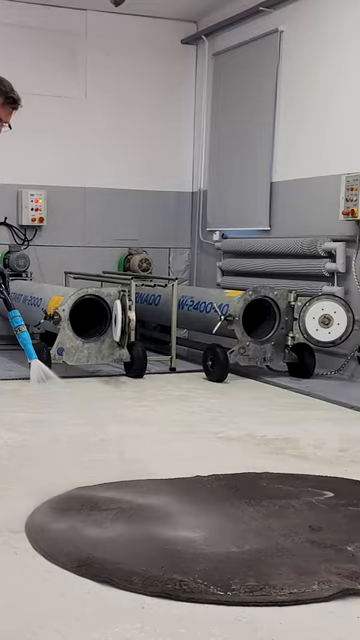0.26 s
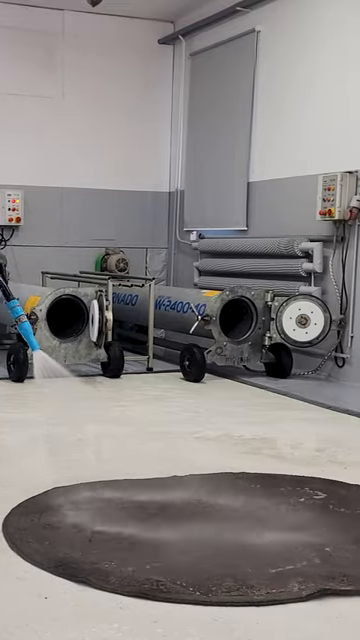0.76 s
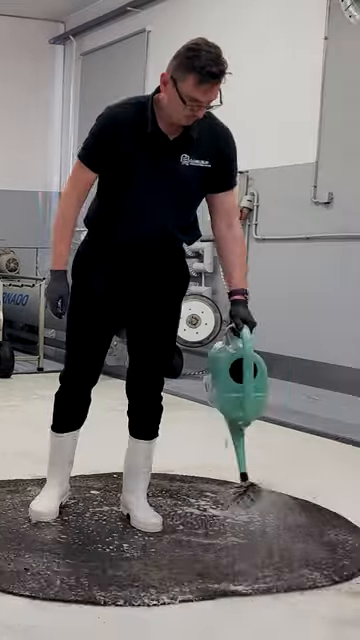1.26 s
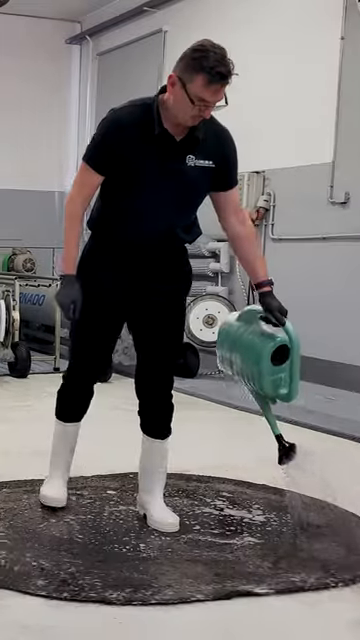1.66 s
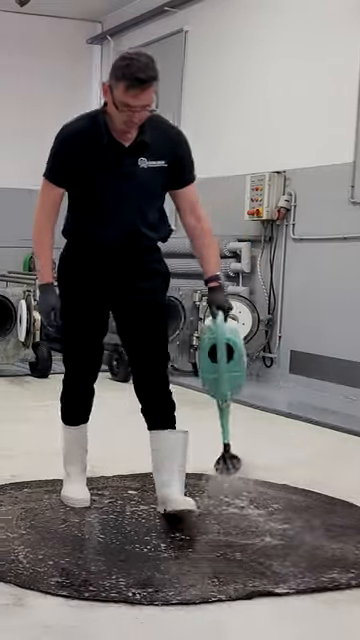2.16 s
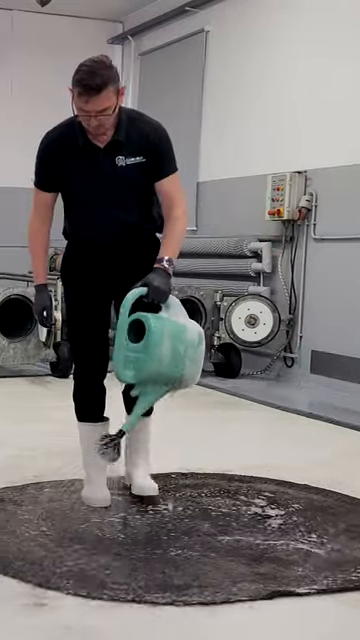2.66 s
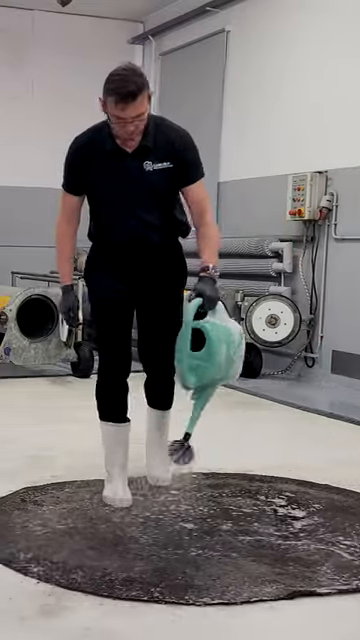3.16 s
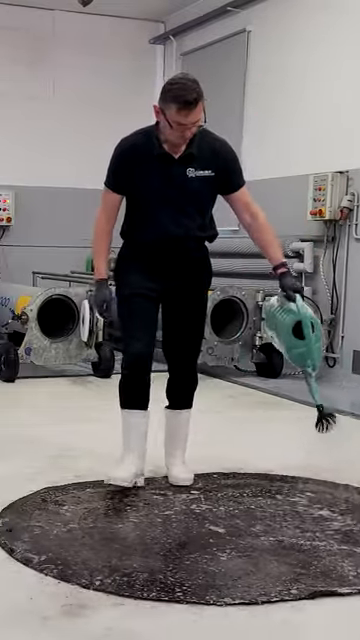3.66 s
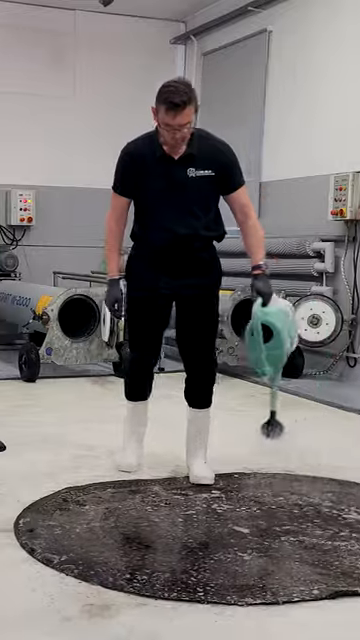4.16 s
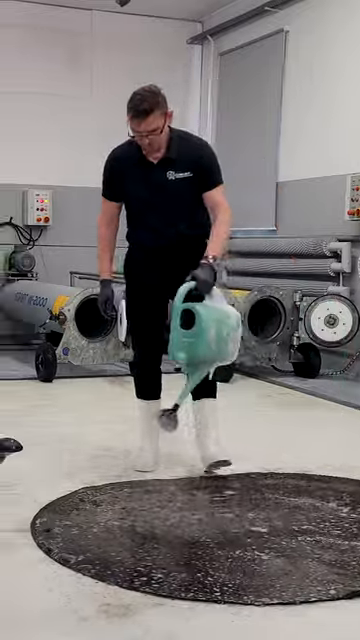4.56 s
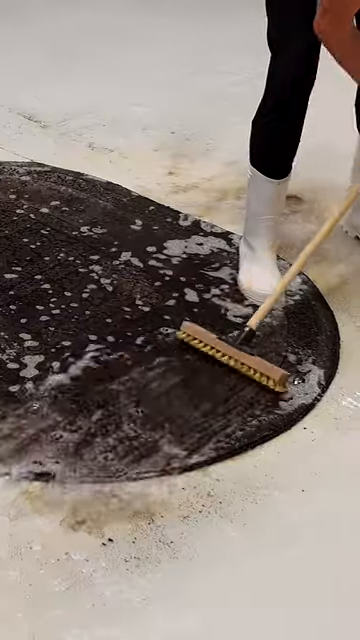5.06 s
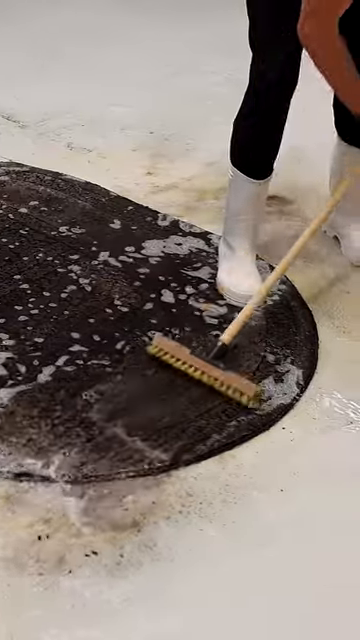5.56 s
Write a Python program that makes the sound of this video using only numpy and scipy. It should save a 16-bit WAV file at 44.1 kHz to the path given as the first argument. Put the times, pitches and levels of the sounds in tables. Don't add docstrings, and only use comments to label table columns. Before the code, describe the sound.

Pressurised spray fades out, light sprinkling with hollow plastic sloshing follows, and brisk bristle strokes scrape a soaked rug in a hard-walled hall.

```python
import sys
import numpy as np
from scipy import signal
from scipy.fft import rfft, irfft, next_fast_len
from scipy.io import wavfile

SR = 44100
rng = np.random.default_rng(int(sys.argv[2]) if len(sys.argv) > 2 else 0)


def gain_from_decibels(decibels):
    exponent = np.asarray(decibels, float) / 20
    return 10 ** exponent


def log_audio(samples):
    frames = np.atleast_2d(samples).T
    limited = np.clip(frames, -1, 1)
    pcm = np.round(limited * 32767).astype(np.int16)
    wavfile.write(sys.argv[1], SR, pcm)


N = 255780

# (frequency [Hz], density [dB per Hz])
LANCE_COLOUR_DB = [(24, -52), (40, -47), (91, -19.5), (218, -2), (360, -0.5), (474, 1.5), (536, -1),
                   (593, 5), (655, -3), (780, -1), (1730, -3.5), (9240, -6.5), (13100, 2), (15600, -2.5)]
SHOWER_COLOUR_DB = [(700, -73), (1000, -22), (1400, -26.5), (2000, -23), (5900, -11.5), (7800, -7),
                    (9000, -8), (12700, 0.5), (13800, 0.5), (15600, -7)]
BRUSH_COLOUR_DB = [(59, -59), (100, -28.5), (230, -22.5), (335, -11.5), (560, -8.5), (1000, -3.5),
                   (1300, -3), (1850, -1.5), (2700, -3), (6000, -6), (10500, -13), (13500, -8.5),
                   (16000, -18)]
HALL_COLOUR_DB = [(15, -54), (30, -27), (48, -16.5), (63, -12.5), (78, -15.5), (130, -15), (240, -20),
                  (400, -8), (700, -16.5), (1100, -25.5), (1500, -32)]
# (low edge [Hz], high edge [Hz])
LANCE_BANDS_HZ = [(120, 400), (430, 1000), (1500, 5000), (8000, 16000)]
SHOWER_BANDS_HZ = [(1400, 2200), (2300, 4000), (4500, 7500), (9000, 16000)]
BRUSH_BANDS_HZ = [(250, 800), (1000, 3000), (4000, 8000), (10000, 16000)]
HALL_BANDS_HZ = [(30, 200)]
# (frequency [Hz], shared power [0-1])
EAR_LIKENESS = [(30, .85), (60, .8), (130, .93), (290, .95), (500, .78), (750, .42), (1200, .03),
                (15000, 0)]

# (time [s], force [dB])
JET_FORCE_DB = [(0, -1), (.26, -1.5), (.39, .5), (.52, -1), (.64, 1), (.92, 0.5), (1.0, -0.5), (1.3, -3),
                (1.72, -11.5)]
# (level at 0 dB force [dB], slope [dB per dB force], share of surge [0-1], late fading loss [dB/s])
JET_LAYERS_DB = [
    (-52.5, 1.65, 0.75, 9),
    (-48.5, 1.16, 0.75, 2),
    (-48.5, 0.65, 0.3, 8.5),
    (-33.5, 1.26, 0.07, .5),
]
# (time [s], change [dB])
JET_SURGES_DB = [(.02, 4.5), (.13, 6), (.24, -1), (.33, 2), (.43, 1), (.7, 3), (.81, -0.5), (.89, 1.5),
                 (1.0, -2), (1.05, -2), (1.11, 1.5), (1.23, -2.5), (1.29, -0.5), (1.43, 5)]

# (time [s], fine patter [dB], left-right [dB])
ROSE_FLOW_DB = [(1.15, -50, 1), (1.55, -41, 1), (1.78, -43, 3.5), (2.11, -38.5, 3.5), (3.02, -37.5, 4.5),
                (3.4, -42.5, 3), (3.85, -41.5, 3), (4.05, -40, 2.5), (4.4, -38.5, 1), (4.52, -42, 3),
                (4.77, -47, 6)]
# (time [s], length [s], slap [dB], splash [dB])
PUDDLES_DB = [
    (1.448, 0.18, -62.5, -67),
    (1.928, 0.3, -67, -54),
    (2.512, 0.41, -82, -66.5),
    (3.1, 0.69, -73, -64.5),
    (3.977, 0.078, -62.5, -75),
    (4.078, .28, -89, -61),
    (4.356, 0.073, -58.5, -56.5),
    (4.51, .25, -65.5, -67),
]

# (time [s], length [s], level [dB], resonance [Hz])
SUMP_SLOSHES = [
    (2.17, .17, -69.5, 200),
    (3.1, 0.058, -65, 187),
    (3.36, 0.32, -62.5, 200),
    (4.15, 0.25, -66.5, 200),
]
BELLY_SLOSHES = [
    (1.002, .1, -50, 277),
    (1.25, .25, -60.5, 281),
    (2.1, .15, -54, 260),
    (2.312, .22, -54.5, 267.5),
    (3.294, .15, -53, 280),
    (3.47, .33, -56, 275),
    (4.02, .12, -61.5, 270),
    (4.164, 0.17, -49.5, 289),
    (4.414, .08, -60, 282),
]
NECK_SLOSHES = [
    (1.0, 0.22, -58, 400),
    (1.3, .35, -59, 420),
    (1.78, 0.33, -58.5, 440),
    (2.14, 0.27, -55.5, 395),
    (2.85, 0.19, -66, 436),
    (3.06, .35, -61.5, 408),
    (3.68, 0.21, -58, 410),
    (3.87, 0.19, -55.5, 423),
    (4.05, 0.13, -50, 375),
    (4.28, 0.1, -59, 370),
]
SHOULDER_SLOSHES = [
    (1.7, .55, -63, 670),
    (3.0, .35, -63, 620),
    (3.5, 0.28, -66, 600),
    (4.0, .3, -60, 700),
    (4.4, 0.38, -63.5, 620),
]
SPOUT_SLOSHES = [
    (1.0, .4, -62, 990),
    (1.48, 0.22, -56.5, 915),
    (1.82, 0.27, -60.5, 1013),
    (2.37, 0.023, -50.5, 880),
    (2.49, 0.043, -56, 885),
    (2.85, 0.27, -62, 1090),
    (3.07, 0.24, -57.5, 920),
    (3.66, 0.046, -63, 1070),
    (3.88, 0.2, -62, 1150),
    (4.39, 0.11, -61, 950),
]
CAN_WIDTHS_HZ = [40, 50.6, 155, 270, 264.6]
CAN_REST_LEVELS_DB = [-99, -78, -64.5, -76.5, -66]

# (time [s], delay to bristle grip [s], length [s], level [dB])
BRUSH_PUSHES = [
    (4.735, 0.022, .125, -1.5),
    (5.211, .001, .12, 1),
    (5.671, 0.0032, .13, -0.5),
]
# (time [s], length [s], level [dB])
BRUSH_PULLS = [
    (4.96, 0.2, -2),
    (5.468, 0.12, -1.5),
]
# (push [dB], rise [s], extra hold [s], fall [s], pull [dB])
BRUSH_LAYERS = [
    (-51.5, 0.066, 0.026, 0.28, -57.5),
    (-37.5, 0.068, 0.016, 0.13, -49),
    (-41.5, .018, .001, 0.11, -50),
    (-36.5, 0.015, .001, 0.091, -43.5),
]

# (time [s], peak [dB], left-right [dB])
BIG_DROPS = [(0.138, -19, 0.5), (0.2703, -32, 0.0), (0.3603, -26, 1.0), (0.5588, -24, 0.5),
             (0.6115, -28, 1.0), (0.6739, -23, 0.5), (0.902, -21, 1.0), (1.1079, -26, 1.0),
             (1.5359, -33, 2.5), (1.719, -31, 2), (1.8497, -27, 4.0), (1.934, -22, 2.5), (2.253, -18.5, 10),
             (2.3191, -33, 5.0), (2.4982, -20, 7), (2.587, -27, 15), (2.6572, -35, 5.0), (2.7751, -30, 3),
             (2.884, -30, 5.0), (3.5533, -29, 3), (3.6152, -22, 3.0), (3.6207, -21, 3.0), (3.814, -33, 7),
             (3.9165, -26, 3.5), (4.0532, -26, 3.5), (4.68, -26, 3)]
# (time [s], peak [dB], left-right [dB])
FOAM_FLICKS = [
    (4.739, -31, 3),
    (4.7419, -20.5, 9),
    (4.7465, -22, 7),
    (4.749, -24, 10),
    (4.753, -24, 5),
    (5.233, -35, 1.5),
    (5.697, -24, 2.5),
]
# (time [s], peak [dB], pitch [Hz])
BOOT_STEPS = [
    (2.70, -62, 62),
    (3.02, -56, 63),
    (3.139, -51.5, 66.6),
    (3.32, -59, 65),
    (3.98, -74, 60.5),
    (4.98, -56, 65),
    (5.66, -66.5, 62),
]
# (time [s], level [dB])
HALL_LEVEL_DB = [(0.0, -75), (1.1, -70.5), (1.8, -76), (2.3, -71), (4.38, -68.5), (4.55, -73.5), (5.8, -80)]


def lance():
    surge_s, fade_start_s = 0.027, 0.88
    start, (force_db,) = in_time(JET_FORCE_DB)
    t = np.arange(len(force_db)) / SR
    surge_db = sum(db * np.exp(-((t - s) / surge_s) ** 2) for s, db in JET_SURGES_DB)
    fading_s = np.maximum(t - fade_start_s, 0)
    levels_db = [db + slope * force_db + share * surge_db - loss * fading_s
                 for db, slope, share, loss in JET_LAYERS_DB]
    jet = spatter(levels_db, LANCE_COLOUR_DB, LANCE_BANDS_HZ, per_s=20000, spread_db=-0.5,
                  patchy_db=1.0, shared_db=0.5, rate_hz=33)
    return place(start, panned(jet, [0.35]), fade_s=0.21)


def shower():
    rise_s, fall_s = 0.048, 0.15
    dry_slap_db, dry_splash_db, patter_under_db = -89, -71.5, -15.5
    start, (fine_db, pan_db) = in_time(ROSE_FLOW_DB)
    t = (start + np.arange(len(fine_db))) / SR
    slaps, splashes = [], []
    for s, length_s, slap_db, splash_db in PUDDLES_DB:
        wet = swell(t, s, length_s, rise_s, fall_s)
        slaps.append(wet * gain_from_decibels(slap_db))
        splashes.append(wet * gain_from_decibels(splash_db))
    slap_db = total_db(gain_from_decibels(dry_slap_db), *slaps)
    splash_db = total_db(gain_from_decibels(dry_splash_db), *splashes)
    patter_db = total_db(gain_from_decibels(fine_db + patter_under_db), gain_from_decibels(splash_db))
    rain = spatter([slap_db, splash_db, patter_db, fine_db], SHOWER_COLOUR_DB, SHOWER_BANDS_HZ,
                   per_s=26000, spread_db=1.6, patchy_db=0.9, shared_db=0.6, rate_hz=40)
    high_pass = signal.butter(2, 8000, "high", fs=SR, output="sos")
    treble = signal.sosfiltfilt(high_pass, rain)
    return place(start, rain - treble + panned(treble, pan_db + 1.3), fade_s=0.008)


def can():
    start_s, end_s = 0.97, 4.78
    rise_s, fall_s, gurgle_db = 0.029, 0.079, 0.5
    t = np.arange(start_s, end_s, 1 / SR)
    size, out = len(t), 0
    spaces = [SUMP_SLOSHES, BELLY_SLOSHES, NECK_SLOSHES, SHOULDER_SLOSHES, SPOUT_SLOSHES]
    for sloshes, rest_db, width_hz in zip(spaces, CAN_REST_LEVELS_DB, CAN_WIDTHS_HZ):
        swells = [gain_from_decibels(db) * swell(t, s, length_s, rise_s, fall_s) for s, length_s, db, _ in sloshes]
        level_db = total_db(gain_from_decibels(rest_db), *swells)
        middles_s = [s + length_s / 2 for s, length_s, *_ in sloshes]
        hz = np.interp(t, middles_s, [row[3] for row in sloshes])
        rush = irfft(impacts(next_fast_len(size), per_s=4000, spread_db=2.0))[:, :size]
        gain = gain_from_decibels(level_db + gurgle_db * drift(17, size))
        out = out + gain * resonate(rush, hz, width_hz)
    return place(round(start_s * SR), panned(out, [1.5]), fade_s=0.065)


def brush():
    start, _, levels_db = strokes()
    scrub = spatter(levels_db, BRUSH_COLOUR_DB, BRUSH_BANDS_HZ, per_s=22000, spread_db=1.5,
                    patchy_db=-0.3, shared_db=-0.4, rate_hz=89)
    return place(start, panned(scrub, [1.2]), fade_s=0.004)


def strokes():
    pull_rise_s, pull_fall_s = 0.024, 0.075
    start = round(BRUSH_PUSHES[0][0] * SR)
    t, levels_db = np.arange(start, N) / SR, []
    for layer, (push_db, rise_s, hold_s, fall_s, pull_db) in enumerate(BRUSH_LAYERS):
        heights = []
        for s, grip_s, length_s, db in BRUSH_PUSHES:
            wait_s = grip_s if layer < 3 else 0
            push = swell(t, s + wait_s, length_s + hold_s, rise_s + wait_s, fall_s)
            heights.append(gain_from_decibels(push_db + db) * push)
        for s, length_s, db in BRUSH_PULLS:
            heights.append(gain_from_decibels(pull_db + db) * swell(t, s, length_s, pull_rise_s, pull_fall_s))
        levels_db.append(total_db(*heights))
    return start, t, levels_db


def brush_head():
    lag_s, hold_s, rise_s, fall_s = 0.087, 0.049, 0.02, 0.068
    grip_hz, sag_hz, sag_s = 1395, 150, 0.024
    start, t, _ = strokes()
    loads_s = [s + grip_s + lag_s for s, grip_s, *_ in BRUSH_PUSHES]
    since_s = np.min([np.where(t >= s, t - s, 9) for s in loads_s], axis=0)
    hz = grip_hz - sag_hz * (1 - np.exp(-since_s / sag_s))
    slips = irfft(impacts(next_fast_len(len(hz)), per_s=2000, spread_db=1.5))[:, :len(hz)]
    ring = resonate(slips, hz, width_hz=160)
    load = sum(swell(t, s, hold_s, rise_s, fall_s) for s in loads_s)
    return place(start, load * gain_from_decibels(-43.5 + 3.3 * drift(30, len(hz))) * ring)


def splats():
    ticks = BIG_DROPS + FOAM_FLICKS
    size, decay_s = 200, 0.00035
    out, t = np.zeros((2, N + size)), np.arange(size) / SR
    for s, peak_db, pan_db in ticks:
        burst = np.sign(rng.standard_normal((1, size))) * np.exp(-t / decay_s)
        at = round(s * SR)
        out[:, at:at + size] += gain_from_decibels(peak_db) * panned(burst, [pan_db])
    band_pass = signal.butter(3, [8500, 15000], "band", fs=SR, output="sos")
    return signal.sosfilt(band_pass, out[:, :N])


def boots():
    size, push_s = 8000, 0.064
    out, t = np.zeros(N + size), np.arange(size) / SR
    push = np.sin(np.pi * np.clip(t / push_s, 0, 1)) ** 2
    for s, peak_db, hz in BOOT_STEPS:
        at = round(s * SR)
        out[at:at + size] += gain_from_decibels(peak_db) * push * np.sin(2 * np.pi * hz * t)
    return out[:N]


def hall():
    start, levels_db = in_time(HALL_LEVEL_DB)
    rumble = spatter(levels_db, HALL_COLOUR_DB, HALL_BANDS_HZ, per_s=30000, spread_db=0,
                     patchy_db=1.6, shared_db=-0.4, rate_hz=1.16)
    return place(start, rumble)


def spatter(levels_db, colour, bands, per_s, spread_db, patchy_db, shared_db, rate_hz):
    length = len(levels_db[0])
    size = next_fast_len(length)
    hz = np.arange(size // 2 + 1) * SR / size + 1
    spectrum = impacts(size, per_s, spread_db) * gain_from_decibels(at_hz(colour, hz))
    power = np.mean(np.abs(spectrum) ** 2, axis=0) * 2 / size ** 2
    gains_db = []
    for level_db, (low, high) in zip(levels_db, bands):
        band_power = power[(hz > low) & (hz < high)].sum()
        gains_db.append(level_db - 10 * np.log10(band_power))
    centres = [np.log2(low * high) / 2 for low, high in bands]
    together_db = shared_db * drift(rate_hz, length)
    first = np.log2(colour[0][0]) // 1
    last = min(np.log2(colour[-1][0]), 14) + 0.5
    out = 0
    for octave in np.arange(first, last, 0.5):
        mask = np.cos(np.pi * np.clip(np.log2(hz) - octave, -0.5, 0.5)) ** 2
        share = [np.interp(octave, centres, row) for row in np.eye(len(bands))]
        gain_db = np.dot(share, gains_db) + together_db + patchy_db * drift(rate_hz, length)
        out = out + gain_from_decibels(gain_db) * irfft(spectrum * mask, size)[:, :length]
    return out * gain_from_decibels(2.5)


def impacts(size, per_s, spread_db):
    hit = rng.random((3, size)) < per_s / SR
    size_db = spread_db * np.minimum(rng.exponential(1, (3, size)), 4)
    both, left, right = rfft(hit * gain_from_decibels(size_db) * rng.standard_normal((3, size)))
    hz = np.arange(len(both)) * SR / size + 1
    alike = np.clip(at_hz(EAR_LIKENESS, hz), 0, 1)
    return np.sqrt(alike) * both + np.sqrt(1 - alike) * np.array([left, right])


def resonate(x, hz, width_hz):
    r = np.exp(-np.pi * width_hz / SR)
    out, state = np.empty_like(x), np.zeros((2, 2, 2))
    for i in range(0, x.shape[1], 512):
        section = [1, 0, -1, 1, -2 * r * np.cos(2 * np.pi * hz[i] / SR), r * r]
        out[:, i:i + 512], state = signal.sosfilt([section, section], x[:, i:i + 512], zi=state)
    return rms_one(out)


def drift(rate_hz, size):
    r = np.exp(-64 * np.pi * rate_hz / SR)
    noise = rng.standard_normal(size // 32 + 1002)
    slow = signal.lfilter([1], [1, -2 * r, r * r], noise)[1000:]
    return np.interp(np.arange(size) / 32, np.arange(len(slow)), rms_one(slow))


def swell(t, start_s, length_s, rise_s, fall_s):
    rise = 1 - np.exp(-np.maximum(t - start_s, 0) / rise_s)
    return rise * np.exp(-np.maximum(t - start_s - length_s, 0) / fall_s)


def total_db(*heights):
    return 10 * np.log10(sum(h ** 2 for h in heights) + 1e-12)


def rms_one(x):
    return x / np.sqrt(np.mean(x ** 2) + 1e-20)


def in_time(rows):
    s, *columns = np.transpose(rows)
    at = np.arange(max(round(s[0] * SR), 0), min(round(s[-1] * SR), N))
    return at[0], [np.interp(at / SR, s, column) for column in columns]


def at_hz(points, hz):
    table_hz, values = np.transpose(points)
    return np.interp(np.log(hz), np.log(table_hz), values)


def panned(sound, pan_db):
    return sound * gain_from_decibels(np.outer([0.5, -0.5], pan_db))


def place(start, sound, fade_s=0.03):
    size = sound.shape[1]
    head = np.arange(size) / (fade_s * SR) + (start == 0)
    tail = np.arange(size)[::-1] / (fade_s * SR) + (start + size >= N - 50)
    out = np.zeros((2, N))
    out[:, start:start + size] = sound * np.clip(np.minimum(head, tail), 0, 1)
    return out


def scene():
    return lance() + shower() + can() + brush() + brush_head() + splats() + boots() + hall()


def band_limit(x):
    return signal.sosfilt(signal.butter(12, 15960, fs=SR, output="sos"), x)


def record(dry):
    return band_limit(dry)


dry = scene()
out = record(dry)
log_audio(out)
```